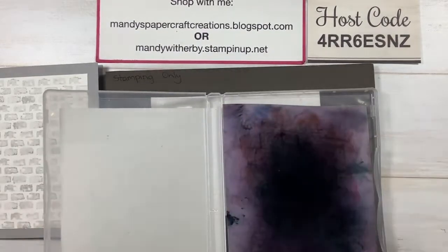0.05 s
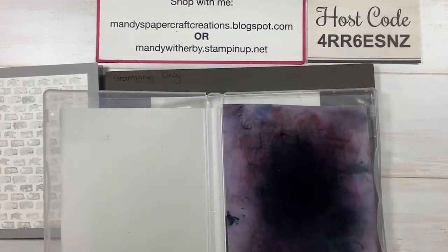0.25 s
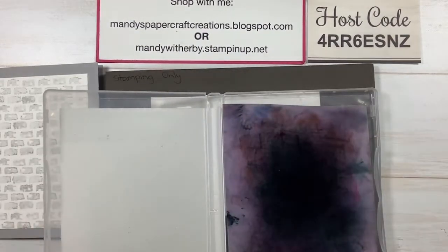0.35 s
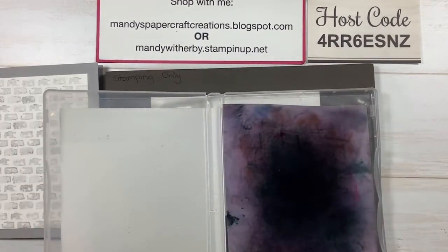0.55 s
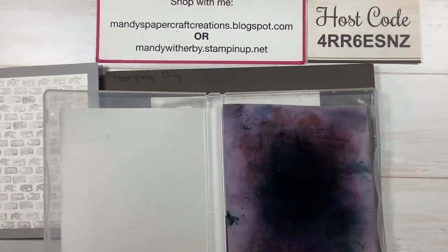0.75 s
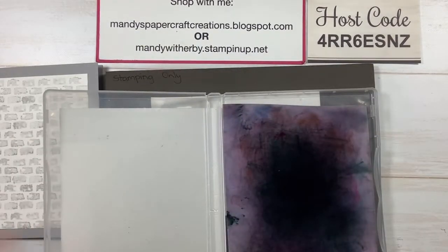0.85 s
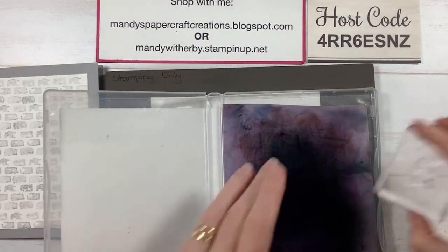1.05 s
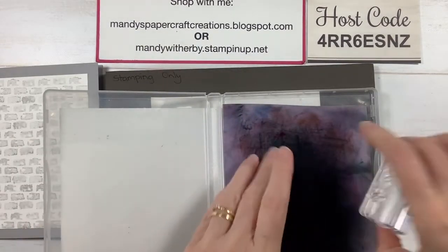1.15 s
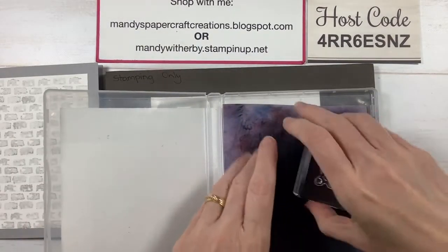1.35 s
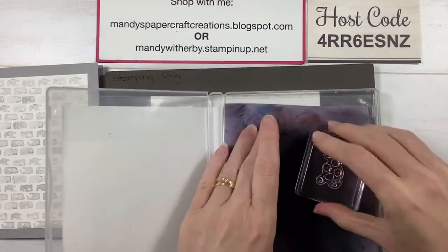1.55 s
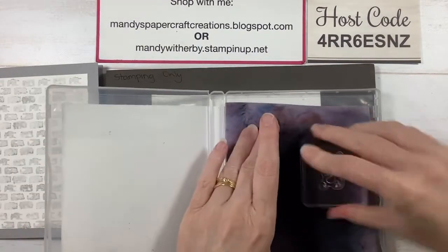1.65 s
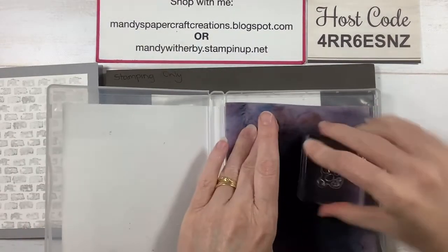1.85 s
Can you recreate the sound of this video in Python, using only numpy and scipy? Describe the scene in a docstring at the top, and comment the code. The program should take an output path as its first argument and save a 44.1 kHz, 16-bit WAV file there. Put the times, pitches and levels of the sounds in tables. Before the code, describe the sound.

Hard plastic block clacking and thudding on a desk, followed by faint finger brushes and ticks

```python
"""A small, quiet room: a clear acrylic stamp block is picked up from a desk.
It knocks, clacks twice and thumps the desk top: struck modes, noise rattles and cracks, desk thuds.
Fingers pat and brush an open plastic ink pad case (damped low modes, grainy filtered noise),
and the block touches it with a few light ticks.
A low room rumble of shaped noise lies underneath; diffuse noise tails are the room's answer."""
import sys
import numpy as np
from scipy import signal
from scipy.fft import rfft, irfft
from scipy.io import wavfile
from scipy.ndimage import uniform_filter1d

SR = 44100
rng = np.random.default_rng(int(sys.argv[2]) if len(sys.argv) > 2 else 0)


def materialize(psi):
    """Save the field psi as 16-bit PCM at rate SR to the path in sys.argv[1].

    A 1-D psi becomes a single channel; in a 2-D psi each row is a channel.
    """
    bounded = np.clip(np.atleast_2d(psi).T, -1, 1)
    quanta = np.round(bounded * 32767).astype(np.int16)
    wavfile.write(sys.argv[1], SR, quanta)


N = 83790
RING_TIME = np.arange(int(0.5 * SR)) / SR  # time axis of one event [s]

# modes of block and plastic case: (frequency [Hz], relative level [dB], t60 of a free ring [s])
PLASTIC_MODES = [(548, -10, .07), (620, -8.5, 0.098), (830.7, -7, 0.15), (1106, -7, .05),
                 (1254, -3.5, 0.12), (1496, -1, .065), (1690, -15.5, .06), (1978, -6.5, 0.1),
                 (2170, -10, 0.084), (2414, -2, .04), (2768, -8.5, 0.01), (3340, -4.5, .03),
                 (3328, -9, 0.012), (3800, -11, .02), (4500, -4.5, .018)]


def from_db(db):
    """Decibels to gain."""
    return 10 ** (np.asarray(db) / 20)


def rms_one(x):
    """Scale to unit rms."""
    return x / np.sqrt(np.mean(x ** 2) + 1e-20)


def at_hz(points, hz, axis=1):
    """Read a table column on a log-frequency axis."""
    table = np.array(points)
    return np.interp(np.log(np.maximum(hz, 1)), np.log(table[:, 0]), table[:, axis])


def cut(x, hz, kind, order=2):
    """Butterworth filter."""
    edge_hz = np.clip(hz, 10, 0.45 * SR)
    sos = signal.butter(order, edge_hz, kind, fs=SR, output="sos")
    return signal.sosfilt(sos, x + 1e-18)


def coloured_noise(spectrum, size):
    """Random-phase noise with the given spectrum; rms 1."""
    gains = from_db(at_hz(spectrum, np.fft.rfftfreq(size, 1 / SR)))
    phases = np.exp(2j * np.pi * rng.random(len(gains)))
    return rms_one(irfft(gains * phases, size))


def dying(t, t60):
    """Exponential decay, 60 dB down at t60."""
    return np.exp(-np.log(1000) * t / t60)


def ring(modes, length=1):
    """Struck modes: decaying sines of alternating sign; length scales every t60."""
    total = np.zeros(len(RING_TIME))
    for k, (hz, db, t60_s) in enumerate(modes):
        sine = np.sin(2 * np.pi * hz * RING_TIME)
        total += (-1) ** k * from_db(db) * sine * dying(RING_TIME, t60_s * length)
    return total


def add(track, s, sound):
    """Mix a sound into a track at a time."""
    start = int(s * SR)
    part = sound[:max(len(track) - start, 0)]
    track[start:start + len(part)] += part


def rumble():
    """Steady room noise, strongest in narrow low humps, falling steadily towards the treble."""
    # background spectrum: (frequency [Hz], relative density [dB per Hz])
    rumble_spectrum = [(20, -32.5), (33, -29.5), (50, -3), (63, 3), (80, -7), (105, -4), (128, 5),
                       (165, -13), (250, -11), (420, -11), (600, -23), (1000, -28), (2000, -38.5),
                       (4000, -41.5), (8000, -44.5), (13000, -50.5), (15500, -54.5)]
    return from_db(-60) * coloured_noise(rumble_spectrum, N)


def reflections():
    """Diffuse room response: noise in octave bands, each dying at its own rate; a new draw per call."""
    # reverberation: (frequency [Hz], level [dB], t60 [s])
    reverb = [(125, -4, 0.1), (500, -7, 0.21), (1001.4, -9, 0.33), (2000, -9, 0.41), (4000, -6, .29),
              (8000, -6.5, .24), (14000, -12, .17)]
    delay_s, build_s = 0.0075, 0.013
    response = np.zeros(len(RING_TIME))
    for hz in 125 * 2.0 ** np.arange(8):
        noise = rng.standard_normal(len(RING_TIME))
        band = cut(noise, [hz / np.sqrt(2), hz * np.sqrt(2)], "band", order=3)
        fade = dying(RING_TIME, at_hz(reverb, hz, axis=2)) * np.minimum(RING_TIME / build_s, 1)
        add(response, delay_s, from_db(at_hz(reverb, hz)) * band * fade / np.linalg.norm(fade))
    return response


def room(x):
    """What the room returns of a sound."""
    return signal.fftconvolve(x, reflections())[:len(x)]


def wash(spectrum):
    """Room tail of a burst with the given spectrum; rms 1 over its first 50 ms."""
    size = 2 * len(RING_TIME)
    gains = from_db(at_hz(spectrum, np.fft.rfftfreq(size, 1 / SR)))
    tail = irfft(rfft(reflections(), size) * gains)[:len(RING_TIME)]
    return tail / np.std(tail[:int(0.05 * SR)])


def brushes():
    """Friction of skin and block: short grainy noise strokes that swell, fade and faintly ring plastic."""
    # strokes over desk, pad and plastic: (time [s], length [s], level [dB],
    # low edge [Hz], high edge [Hz], peak position [share of length])
    strokes = [(0.0, 0.049, -58, 301, 650, 0.14), (0.077, 0.11, -65.5, 320, 770, 0.13),
               (0.749, 0.028, -56, 900, 6360, 0.34), (0.750, 0.029, -69, 3110, 13050, 0.15),
               (0.97, 0.15, -66, 377.6, 800, 0.47), (1.009, 0.033, -71.5, 4500, 15960, 0.18),
               (1.047, .014, -73, 4500, 15800, .3), (1.12, 0.08, -65, 328, 727, 0.22),
               (1.47, 0.25, -63, 119.2, 144, 0.39), (1.499, 0.1, -66, 1004, 2400, 0.49),
               (1.515, 0.031, -56.5, 205.5, 310, 0.44), (1.588, 0.053, -65, 1177, 4800, 0.21),
               (1.591, 0.1, -78.5, 2920, 12500, 0.13), (1.632, 0.031, -69.5, 1105, 2360, 0.65),
               (1.655, .045, -71.5, 2904, 3820, 0.37), (1.705, 0.0474, -60, 950, 1570, 0.86),
               (1.755, 0.035, -71.5, 3460, 7780, 0.44), (1.857, 0.055, -53, 650, 1730, 0.41)]
    grain_rms_db, grain_s = 2, 0.0013
    rubbing = np.zeros(N)
    for s, length_s, db, low_hz, high_hz, peak in strokes:
        white, slips = rng.standard_normal((2, len(RING_TIME)))
        slow_slips = rms_one(uniform_filter1d(slips, max(int(grain_s * SR), 1)))
        grainy = white * from_db(grain_rms_db * slow_slips)
        friction = rms_one(cut(cut(grainy, low_hz, "high", order=3), high_hz, "low", order=7))
        swell = np.interp(RING_TIME / length_s, [0, np.clip(peak, 0, 1), 1], [0, 1, 0])
        add(rubbing, s, from_db(db) * swell * friction)
    plastic = ring(PLASTIC_MODES)
    ringing = signal.fftconvolve(rubbing, plastic / np.linalg.norm(plastic))[:N]
    return rubbing + from_db(-20) * ringing


def pats():
    """Cushioned blows reach only the lowest modes of the case; gives direct sound and room send."""
    # blows by fingers or the padded block: (time [s], peak level [dB], room send [dB])
    blows = [(0.083, -50, 9), (0.141, -51.5, 11), (0.5160, -21.5, -12), (0.9775, -49.5, 10),
             (1.0145, -46.5, 7.5), (1.0575, -47, 4.5), (1.1245, -47.5, 3), (1.138, -48, -1),
             (1.811, -48.5, 12), (1.854, -47.5, 10.5)]
    # modes of the patted case: (frequency [Hz], relative level [dB], t60 [s])
    case_modes = [(414, 2.5, 0.009), (582, 2, 0.023), (761.5, -3.5, .012)]
    low_cut_hz, soft_hz = 410, 950
    direct, send = np.zeros((2, N))
    pat = cut(cut(ring(case_modes), low_cut_hz, "high"), soft_hz, "low", order=4)
    pat = pat / np.abs(pat).max()
    for s, db, room_db in blows:
        add(direct, s, from_db(db) * pat)
        add(send, s, from_db(db + room_db) * pat)
    return direct, send


def knocks():
    """Each contact cracks, rings the plastic, rattles briefly and shakes the desk; the room answers."""
    # hard contacts of the block: (time [s], body level [dB], low cut [Hz], contact brightness [Hz],
    # ring length [share of a free ring], crack level [dB], desk thud level [dB], room send [dB])
    contacts = [(0.2132, -33, 200, 2120, 0.95, -41, -32.5, -2),
                (0.2631, -41, 295, 2470, 0.67, -51, -39, -3), (0.3795, -19, 620, 3900, 0.85, -35.5, -43, 1),
                (0.3956, -19.5, 170, 7130, 0.82, -33, -40.5, -5.5),
                (0.516, -22.5, 194, 1035, 0.69, -71, -29.5, -0.5),
                (0.7572, -61, 300, 7850, 2.9, -55.5, -58, -2),
                (1.1411, -64.5, 1200, 6028, 0.26, -66.5, -79, -5),
                (1.598, -63, 1000, 5000, .6, -67, -63, -1), (1.662, -72, 2500, 6000, 0.44, -66, -78, -8),
                (1.7840, -46, 1474, 4340, 0.49, -59.5, -90.5, -2)]
    # dense short rattle of the contact: (frequency [Hz], relative density [dB per Hz])
    rattle_spectrum = [(150, -3), (450, 0.5), (800, -4.5), (1250, 0), (1650, -2.5), (2400, -3), (3400, -6),
                       (4600, -15.5), (5900, -22.5), (7200, -23.5), (9000, -33.5), (15000, -39)]
    # bright crack at the instant of contact: (frequency [Hz], relative density [dB per Hz])
    crack_spectrum = [(1000, -18.5), (3000, 6.5), (5000, 4.5), (7300, -2), (8800, -17.5), (11000, -25),
                      (15000, -24.5)]
    # desk top: (frequency [Hz], relative level [dB], t60 [s])
    desk_modes = [(126.9, 1.5, 0.17), (205, -7.5, .1), (256.6, -4, 0.15), (316.7, -2.5, .17),
                  (369, -5.5, 0.13), (418, -7.5, .11)]
    tone_db, rattle_db = -3, 1.5
    tone_room_db, rattle_room_db, crack_room_db = -6.5, -13, -20
    attack_s, free_hold_s, free_t60_s = 0.0006, 0.0069, 0.019  # rattle; length scales the last two
    desk_rise_s, crack_t60_s = 0.0073, 0.036

    out, t = np.zeros(N), RING_TIME
    desk = ring(desk_modes) * (1 - np.exp(-t / desk_rise_s))
    desk_tail = room(desk)
    crack_tail = from_db(crack_room_db) * wash(crack_spectrum)
    for s, db, low_hz, contact_hz, length, crack_db, desk_db, room_db in contacts:
        send = from_db(room_db)
        tone = from_db(tone_db) * ring(PLASTIC_MODES, length)
        decay = dying(np.maximum(t - free_hold_s * length, 0), free_t60_s * length)
        rattle = np.minimum(t / attack_s, 1) * decay * coloured_noise(rattle_spectrum, len(t))
        rattle += send * from_db(rattle_room_db) * np.sqrt(length) * wash(rattle_spectrum)
        body = tone + send * from_db(tone_room_db) * room(tone) + from_db(rattle_db) * rattle
        body = cut(cut(body, low_hz, "high"), contact_hz, "low", order=4)
        crack = dying(t, crack_t60_s) * coloured_noise(crack_spectrum, len(t)) + send * crack_tail
        thud = desk + send * desk_tail
        add(out, s, from_db(db) * body)
        add(out, s, from_db(crack_db) * crack + from_db(desk_db) * thud)
    return out


def scene():
    """Rumble, fingers, block and room at one microphone."""
    friction = brushes()
    fingers, finger_send = pats()
    handling_tail = room(finger_send + from_db(-1.5) * friction)
    mix = rumble() + friction + fingers + handling_tail + knocks()
    return mix[None]


def record(dry):
    """Steep elliptic low-pass over the whole mix."""
    cutoff_hz, ripple_db, stop_db = 15750, 0.1, 80
    sos = signal.ellip(10, ripple_db, stop_db, cutoff_hz, fs=SR, output="sos")
    return signal.sosfilt(sos, dry)


dry = scene()
out = record(dry)
materialize(out)
```